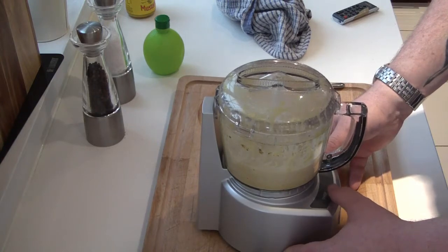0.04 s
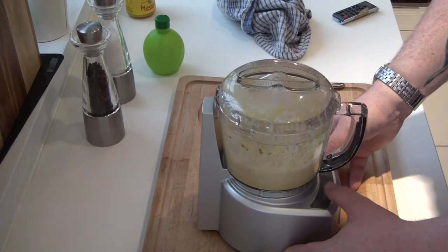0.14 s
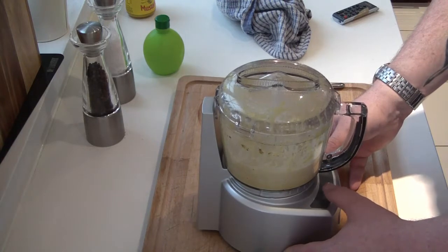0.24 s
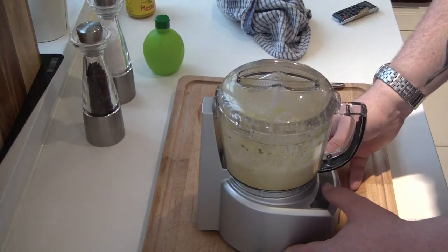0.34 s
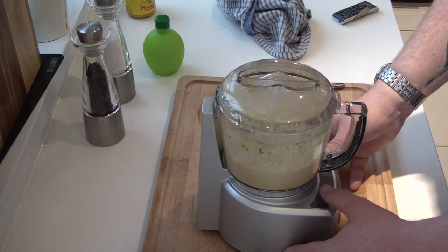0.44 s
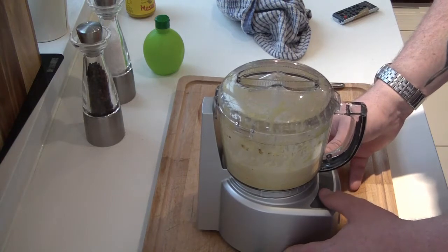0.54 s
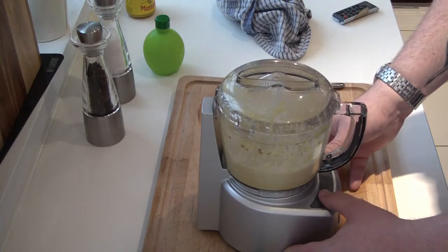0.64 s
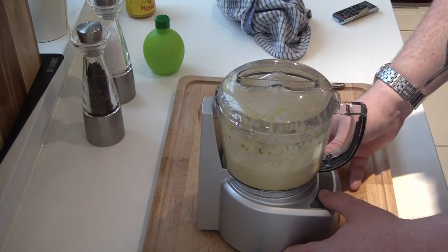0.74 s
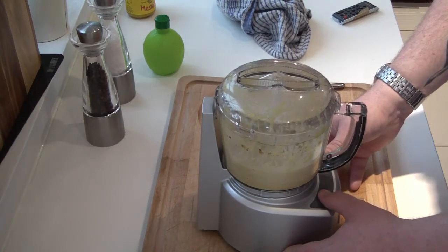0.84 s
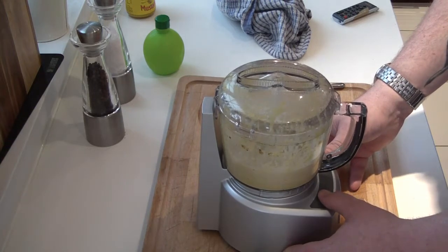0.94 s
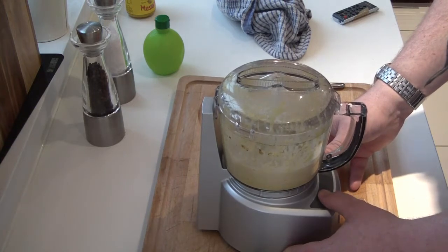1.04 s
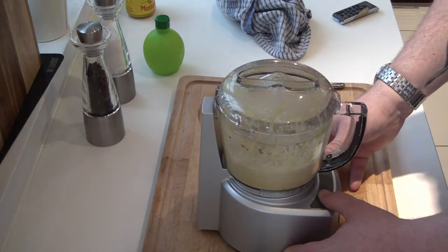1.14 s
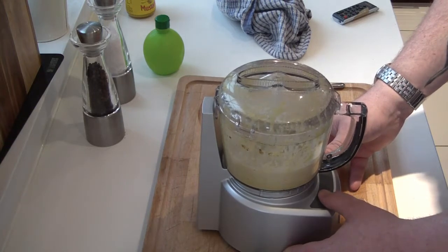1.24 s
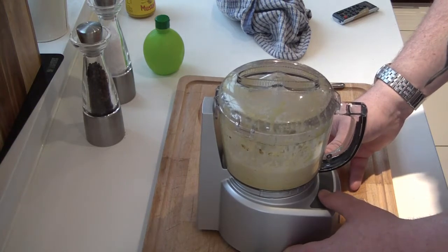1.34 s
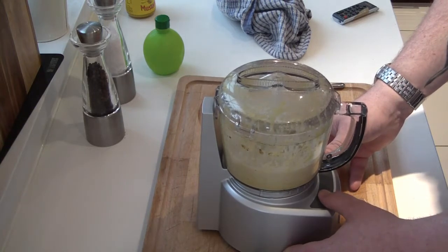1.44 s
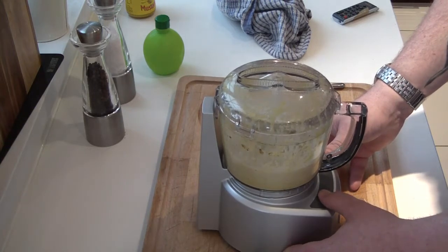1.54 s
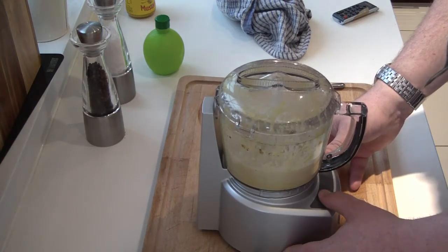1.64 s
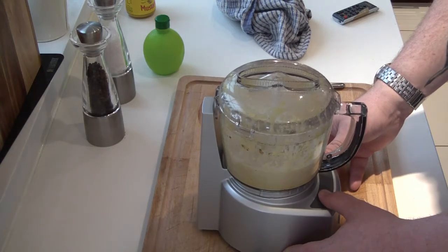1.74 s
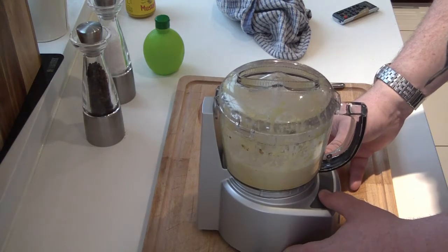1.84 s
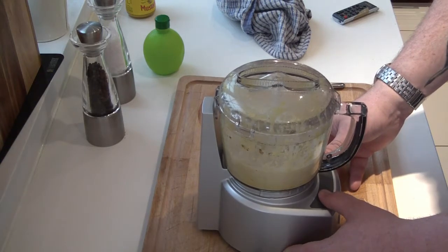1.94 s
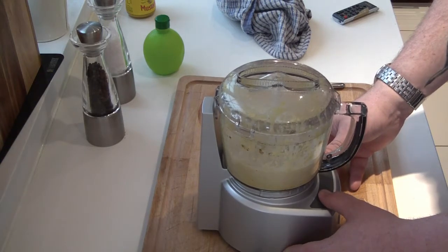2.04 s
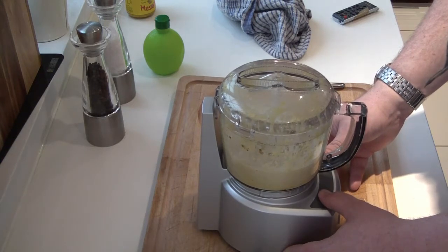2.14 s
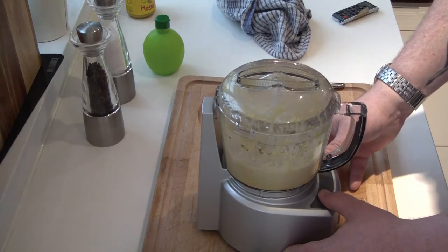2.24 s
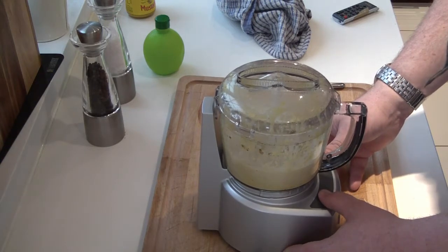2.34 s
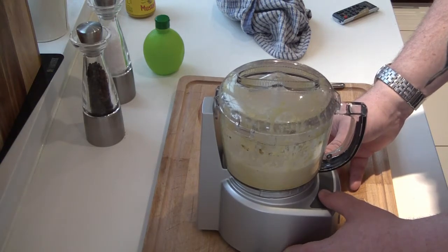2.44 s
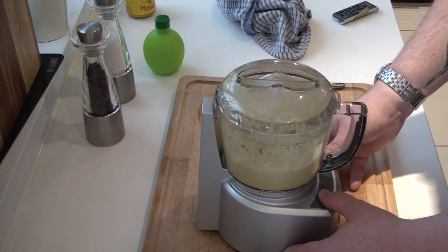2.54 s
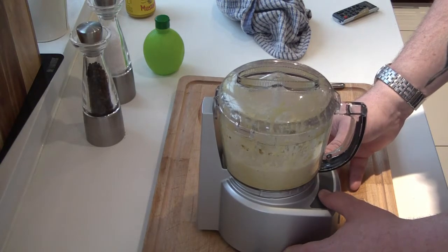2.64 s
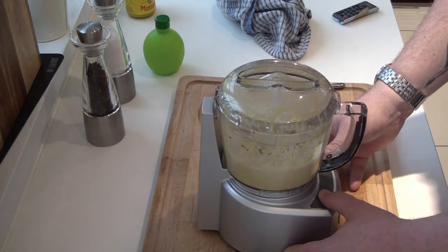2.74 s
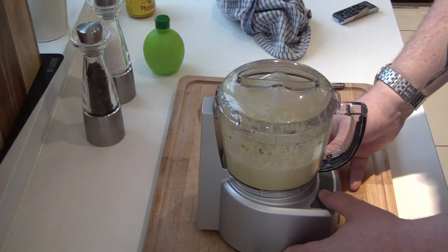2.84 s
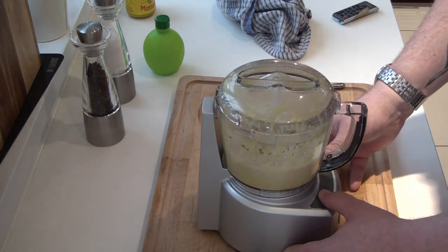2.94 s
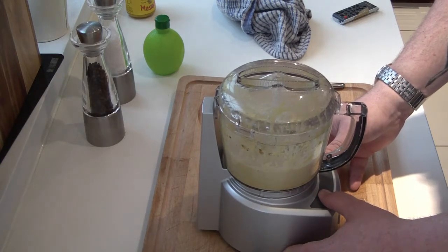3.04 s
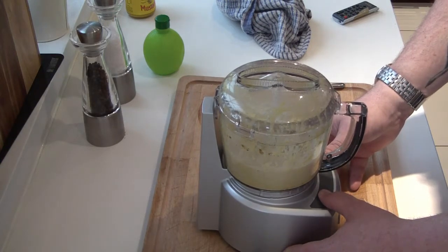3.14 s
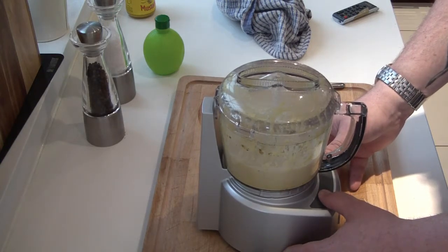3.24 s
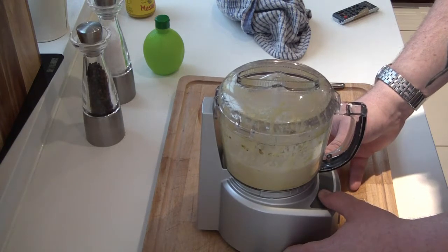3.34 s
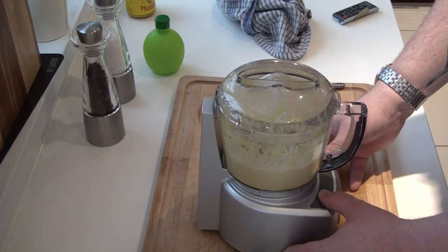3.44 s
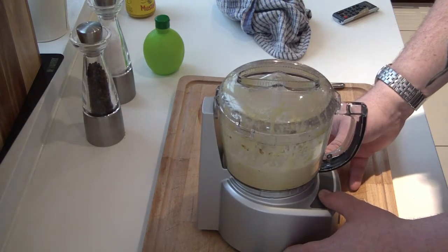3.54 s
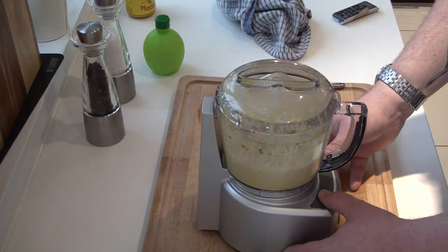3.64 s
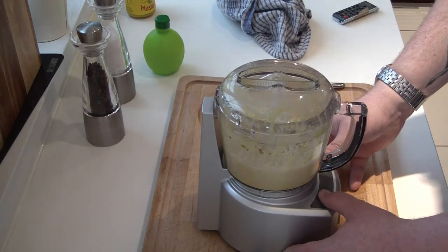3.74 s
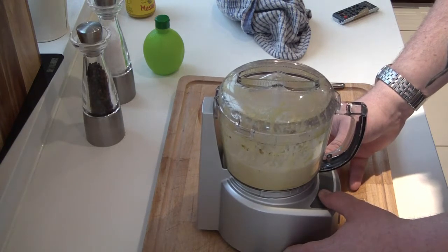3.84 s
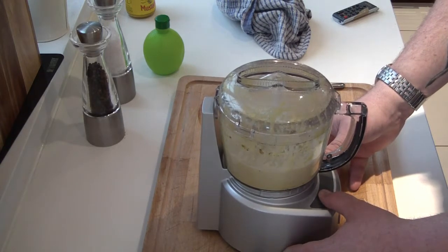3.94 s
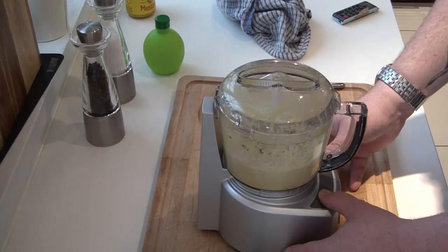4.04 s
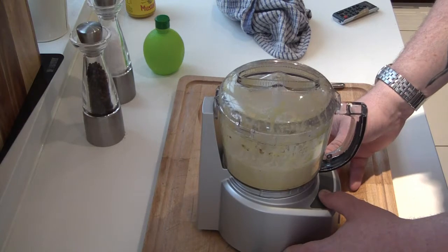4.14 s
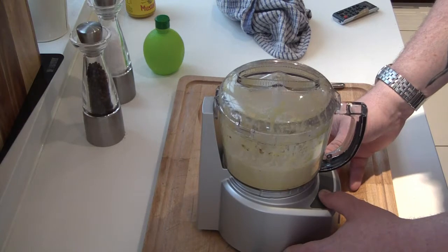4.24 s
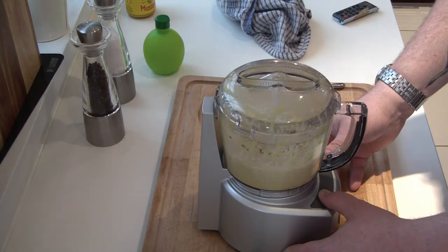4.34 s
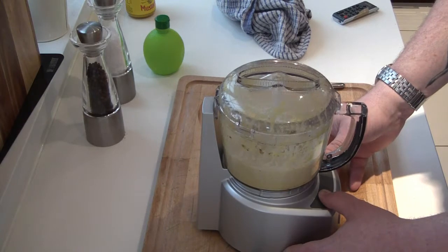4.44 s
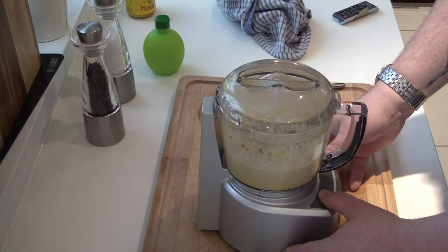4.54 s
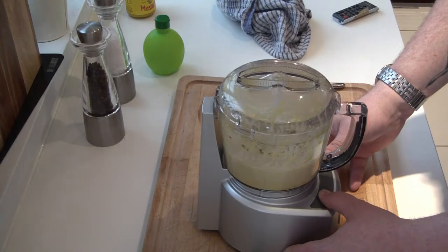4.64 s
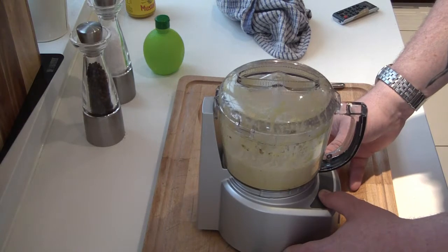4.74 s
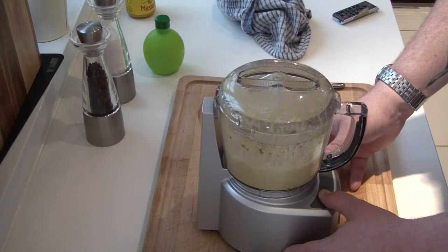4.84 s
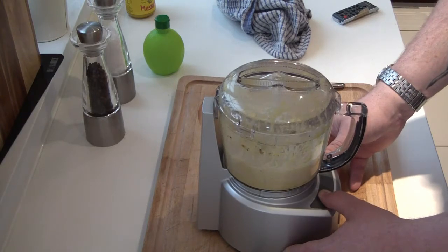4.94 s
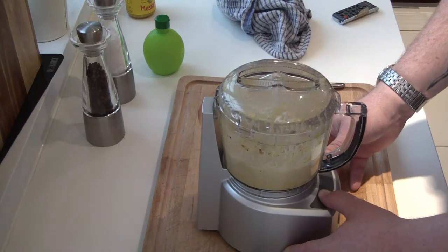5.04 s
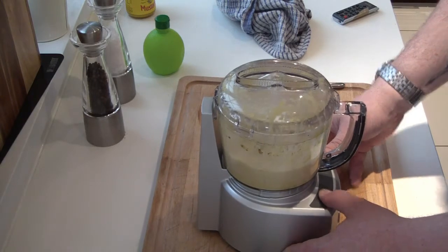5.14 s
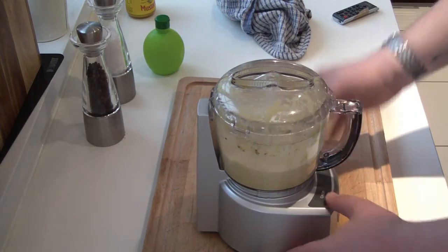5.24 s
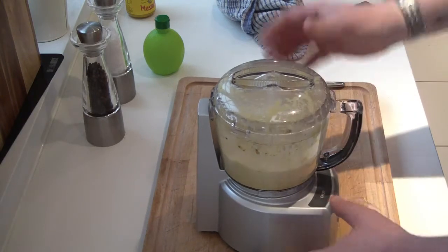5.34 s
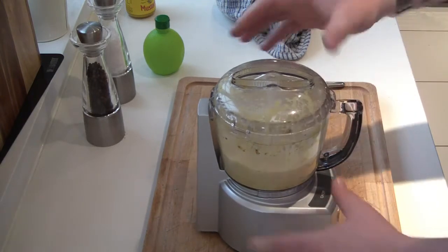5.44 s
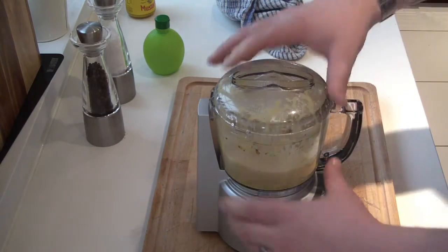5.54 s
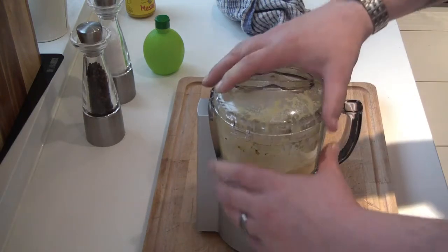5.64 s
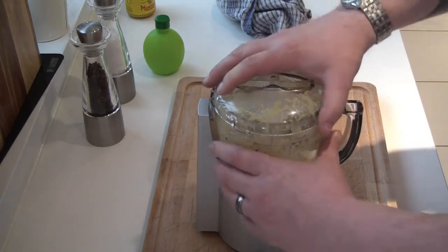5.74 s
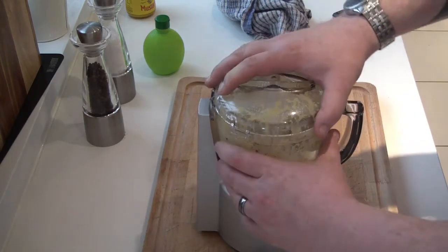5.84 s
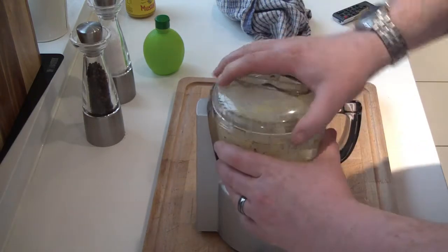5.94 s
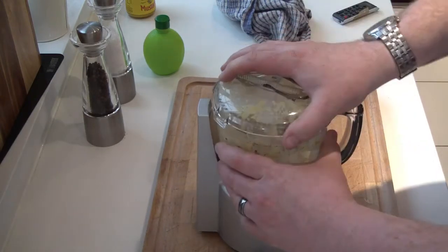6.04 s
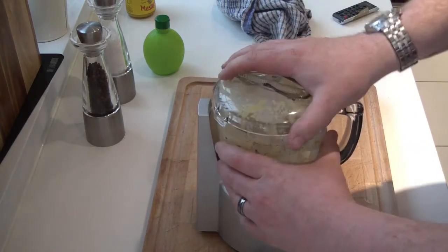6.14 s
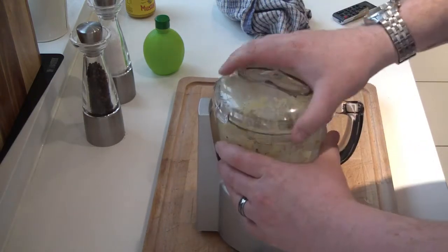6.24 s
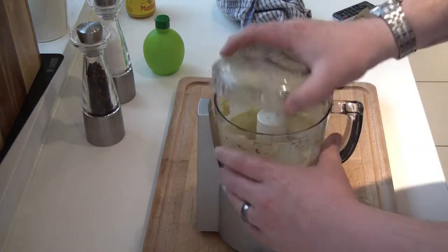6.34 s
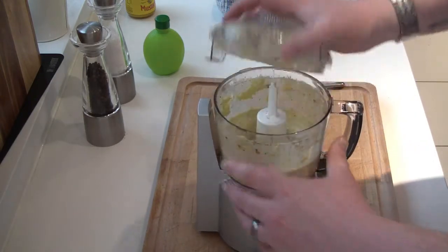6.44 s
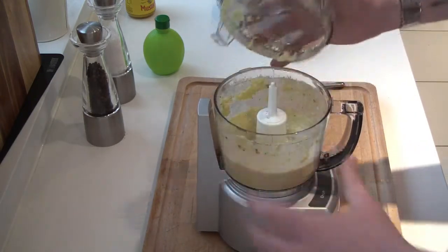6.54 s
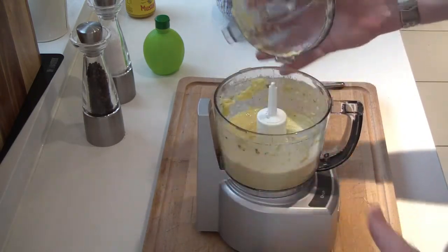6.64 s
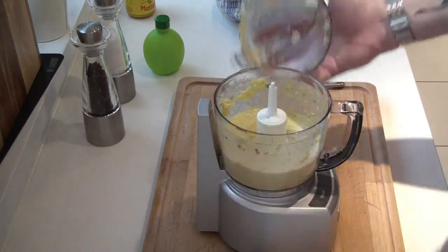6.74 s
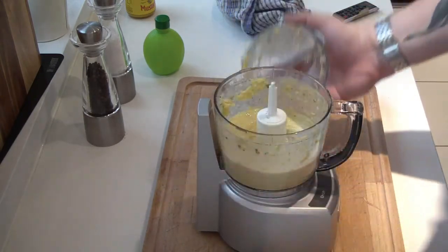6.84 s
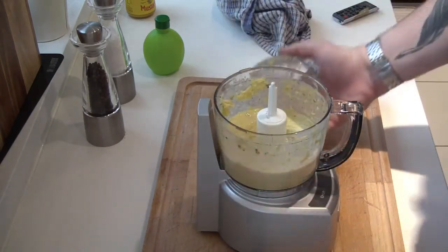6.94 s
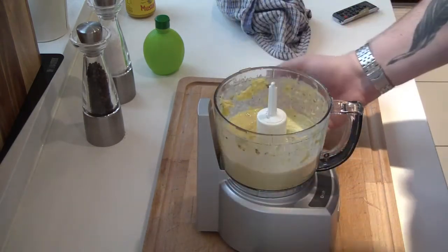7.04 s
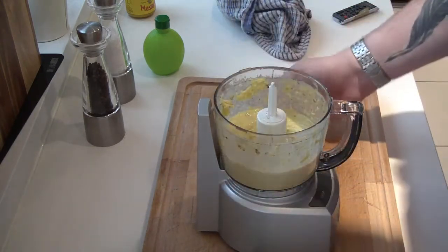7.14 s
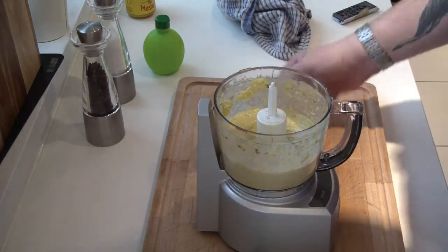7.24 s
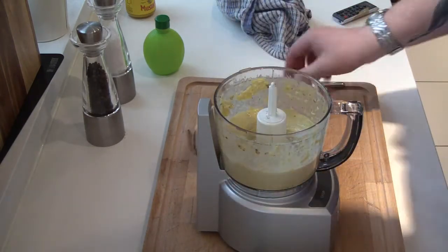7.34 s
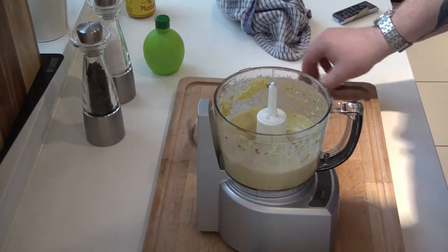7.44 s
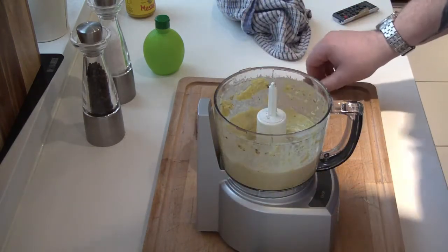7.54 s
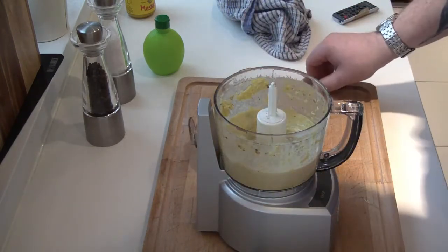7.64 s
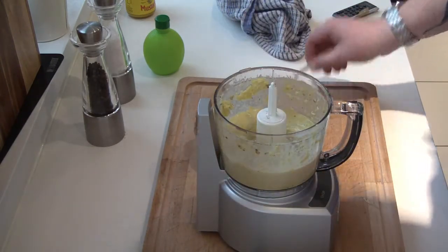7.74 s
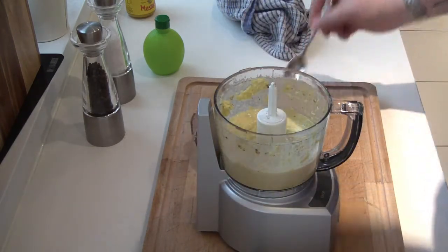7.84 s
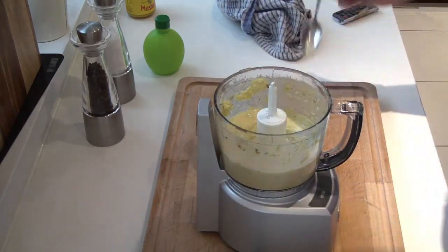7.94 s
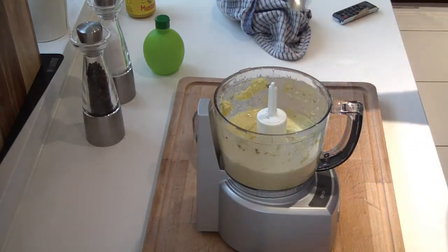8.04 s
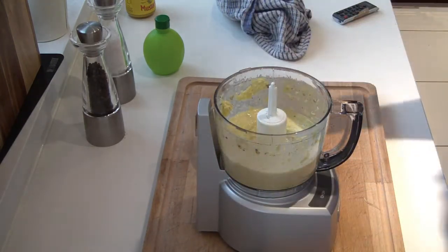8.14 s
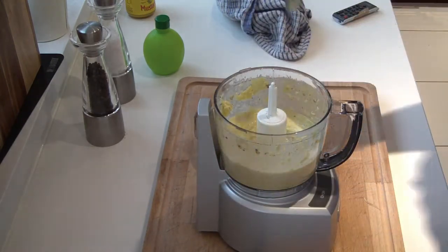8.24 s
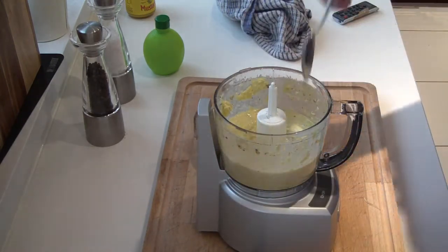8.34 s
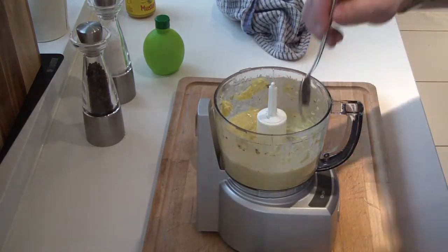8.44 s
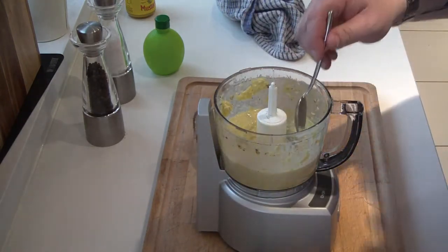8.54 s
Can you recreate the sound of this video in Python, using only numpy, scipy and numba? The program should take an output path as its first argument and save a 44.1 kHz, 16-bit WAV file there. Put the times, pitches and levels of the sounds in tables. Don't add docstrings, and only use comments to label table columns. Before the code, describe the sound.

Close stereo pickup of a small geared kitchen machine: rough bright whine, fizzing food churn and low drumming on a board. A brief drop and restart come early, then steady running and a fast falling whine to a stop. A hard latch click, soft handling, a double plastic clack and rattling rocks follow, with short kitchen reverberation. Loud moments sound flattened by automatic gain; quiet hiss remains.

```python
import sys
import numpy as np
from scipy import signal
from scipy.fft import rfft, irfft, next_fast_len
from scipy.io import wavfile
from scipy.ndimage import uniform_filter1d, map_coordinates
from numba import njit

SR = 44100
rng = np.random.default_rng(int(sys.argv[2]) if len(sys.argv) > 2 else 0)


def wav_record(signal):
    frames = np.transpose(np.atleast_2d(signal))
    bounded = np.clip(frames, -1, 1)
    quanta = np.round(bounded * 32767).astype(np.int16)
    wavfile.write(sys.argv[1], SR, quanta)


def field_ratio(decibels):
    return 10 ** (np.asarray(decibels, dtype=float) / 20)


N = 378378
TEETH = 20


def unit(x):
    return x / np.sqrt(np.mean(np.abs(x) ** 2) + 1e-20)


def along(points, hz):
    f, v = np.transpose(points)
    return np.interp(np.log(hz + 1), np.log(f + 1), v)


def drift(position):
    return map_coordinates(rng.standard_normal(int(position[-1]) + 4), [position])


def wander(rate, phase):
    return drift(rate) * np.sin(phase) + drift(rate) * np.cos(phase)


def filtered(x, response):
    m = next_fast_len(N + SR // 2)
    return irfft(rfft(x, m) * response(np.fft.rfftfreq(m, 1 / SR)), m)[..., :N]


def coloured(spectrum):
    closed = [(10, -90)] + list(spectrum) + [(20000, -90)]
    return unit(filtered(rng.standard_normal(N), lambda hz: field_ratio(along(closed, hz))))


def resonant(modes):
    def response(f):
        total = 0
        for k, (centre, width, db) in enumerate(modes):
            damping = 1j * f * abs(width)
            total = total + (-1) ** k * field_ratio(db) * 1j * f * abs(width) / (centre * centre - f * f + damping)
        return total
    return response


def soft(corner_hz):
    return lambda hz: 1 / (1 + 1j * hz / corner_hz) ** 2


# pressed and let go in seconds, full tooth-mesh rate in Hz,
# whistle under steady load in dB.
PRESSES = [
    (-1, .345, 3730, -12.5),
    (.712, 5.27, 3626, -47),
]


def rotor():
    spin_up_s, creep_s, creep_share = .11, .35, .05
    brake_hz_per_s, brake_onset_s, crawl_hz = 10100, .04, 270
    t = np.arange(N) / SR
    mesh_hz, steady_db = np.zeros(N), np.zeros(N)
    for pressed, released, full_hz, whistle_db in PRESSES:
        on, off = np.clip(t - pressed, 0, None), np.clip(t - released, 0, None)
        start_hz = mesh_hz[max(int(pressed * SR), 0)]
        lag = (1 - creep_share) * np.exp(-on / spin_up_s) + creep_share * np.exp(-on / creep_s)
        lost_hz = brake_hz_per_s * (off - brake_onset_s * (1 - np.exp(-off / brake_onset_s)))
        wanted_hz = full_hz - (full_hz - start_hz) * lag - lost_hz
        run_hz = crawl_hz * np.logaddexp(0, wanted_hz / crawl_hz)
        mesh_hz = np.where(t > pressed, run_hz + 1, mesh_hz)
        steady_db = np.where(t > pressed, whistle_db, steady_db)
    torque = np.gradient(mesh_hz) * SR / brake_hz_per_s
    torque = uniform_filter1d(torque, size=SR // 25 + 1, origin=SR // 50)
    pull, brake = np.tanh(3.7 * np.clip(torque, 0, None)), np.clip(-torque, 0, 1)
    return mesh_hz, pull, brake, steady_db


# multiple of mesh rate, relative width, level in dB.
MESH = [(.96, .06, 0), (.9, .22, -1), (1.97, .07, -2.5), (1.86, .17, -3), (2.92, .14, 1), (2.55, .35, -32)]
# shaft order, level in dB.
TONES = [(19, -11), (20, -12), (40, -18), (16.6, -19)]
# frequency in Hz, level in dB.
CASE = [(300, -29), (700, -1), (1400, -67), (2400, 5.5), (3500, 6), (5000, -1.5), (8000, 4.5), (12000, -2),
        (15000, -10)]


def gear_whine(teeth, pace, pull):
    t = np.arange(N) / SR
    shaft = 2 * np.pi * teeth / TEETH
    whine = np.zeros(N)
    for multiple, width, db in MESH:
        band = wander(abs(width) * 2 * teeth, 2 * np.pi * multiple * teeth)
        whine += field_ratio(db) * pace ** (0.85 * multiple) * band
    for order, db in TONES:
        whine += field_ratio(db + 4.9 * drift(14 * t)) * np.sin(order * shaft + 2.54 * drift(22 * t))
    whine *= 1 + .2 * np.cos(shaft) + .15 * np.cos(shaft / 3)
    whine = unit(filtered(whine, lambda hz: field_ratio(along(CASE, hz))))
    slow_db, pull_db = 11, 7
    return whine * field_ratio(-20.5 + slow_db * (1 - pace) + pull_db * pull + 1.4 * drift(12 * t))


# frequency in Hz, width in Hz, level in dB.
GEARBOX = [(2700, 2760, -3)]


def gear_whistle(teeth, pace, pull, brake, steady_db):
    t = np.arange(N) / SR
    pull_db, coast_db = -8, -15.5
    torque_grip = field_ratio(pull_db) * pull + field_ratio(coast_db) * brake
    grip = field_ratio(steady_db) * (1 - brake) + torque_grip * pace ** 0.72
    flank = 2 * np.pi * .965 * teeth + 0.7 * drift(.05 * teeth)
    tone = 0.58 * np.sin(flank) + wander(130 * t, flank)
    overtone = 0.5 * wander(250 * t, 2 * flank)
    cavity = resonant(GEARBOX)
    return filtered(grip * (tone + overtone), lambda hz: cavity(hz) * soft(corner_hz=7000)(hz))


# frequency in Hz, level in dB per Hz.
CHURN = [(90, -32), (200, -22.5), (440, -29), (700, -28.5), (1200, -22), (1400, -17), (1700, -15.5),
         (2100, -19), (4000, -12), (5000, -19), (9000, -13.5), (12000, -19), (14700, -27)]


def churning(teeth, pace, pull):
    t = np.arange(N) / SR
    blade_turn = np.cos(2 * np.pi * teeth / TEETH / 4)
    churn = coloured(CHURN) * field_ratio(1.5 * drift(60 * t) + .8 * drift(7 * t) + .8 * blade_turn)
    dull = unit(filtered(churn, soft(corner_hz=5800)))
    churn = pace ** 1.3 * churn + .9 * (1 - pace) * dull
    slow_db, pull_db = 3.5, 6
    return churn * field_ratio(-19.5 + slow_db * (1 - pace) + pull_db * pull)


# frequency in Hz, width in Hz, level in dB.
BASE = [(165.5, 30, -20.5), (221.5, 9.8, -14), (272.3, 18, -3), (310.7, 11.9, 0), (351.4, 19.7, -10),
        (579, 39, -24.5)]


def base_drone(teeth, pull, brake):
    t = np.arange(N) / SR
    blade = np.diff(np.floor(teeth / TEETH / 4), prepend=0)
    drone = unit(filtered(0.34 * unit(blade) + rng.standard_normal(N), resonant(BASE)))
    coast_db, pull_db, sway_db = -5.5, 4.5, 2
    return drone * field_ratio(-28 + coast_db * brake + pull_db * pull + sway_db * drift(12 * t))


# frequency in Hz, level in dB per Hz.
SHAKE = [(30, -16), (48, 2), (63, 10), (73, -56), (120, -25)]


def motor():
    mesh_hz, pull, brake, steady_db = rotor()
    teeth = np.cumsum(mesh_hz) / SR
    pace = mesh_hz / mesh_hz.max()
    stop_s, stop_fade_s = 5.84, 0.09
    coast = np.clip((stop_s - np.arange(N) / SR) / stop_fade_s, 0, 1)
    dying_pace = 0.064
    alive = pace * (1 + dying_pace) / (pace + dying_pace)
    works = gear_whine(teeth, pace, pull) + churning(teeth, pace, pull) + base_drone(teeth, pull, brake)
    shake = field_ratio(-40.5) * coloured(SHAKE)
    whistle = gear_whistle(teeth, pace, pull, brake, steady_db)
    return coast * (alive * works + pace * shake + whistle)


def knocks(table, body, shell, contact_hz, drive_db, drag=1):
    t = np.arange(SR // 12) / SR / drag
    push = np.zeros((3, N + len(t)))
    decay_s = np.array([[.014], [.011], [.009]])
    for s, *band_db in table:
        rough = rng.standard_normal((3, len(t))) * field_ratio(-60 * t / decay_s) * (1 - np.exp(-t / 0.00044))
        rough /= np.linalg.norm(rough, axis=1, keepdims=True)
        rough *= np.clip([[.39], [.28], [.2]] * np.array(drag), 0, 1)
        rough[:, 9] += 1 / drag ** 2
        push[:, round(s * SR):][:, :len(t)] += field_ratio(np.array(band_db) + drive_db)[:, None] * rough
    thud = filtered(push[0, :N], lambda hz: resonant(body)(hz) * soft(corner_hz=2500)(hz))
    clack = filtered(push[1, :N], lambda hz: resonant(shell)(hz) * soft(contact_hz)(hz))
    crack = filtered(push[2, :N], resonant([(8200, 36000, 0)]))
    return field_ratio(41.0) * thud + field_ratio(36.0) * clack + field_ratio(29) * crack


# start in seconds, body, shell and crack levels in dB.
LATCH = [
    (5.9705, -14, -6, -7.5),
    (5.9755, -15, -26, -22),
    (5.988, -13, -25, -34),
    (6.369, -39.5, -39, -36.5),
]
# start in seconds, body, shell and crack levels in dB.
NUDGE = [
    (5.922, -14, -70, -73),
    (5.972, -12.5, -70, -80),
    (7.999, -27, -63, -57),
]
# frequency in Hz, width in Hz, level in dB.
BOWL = [(143.8, 54, -1), (297, 37, 1), (582, 150, 6.5), (1010, 200, 3.5)]
BOWL_WALL = [(2430, 94, 4.5), (1170, 1100, -12), (3270, 9300, -2)]


def unlatching():
    snap = knocks(LATCH, BOWL, BOWL_WALL, contact_hz=8880, drive_db=1.0, drag=1.14)
    return snap + knocks(NUDGE, BASE, BOWL_WALL, contact_hz=3000, drive_db=8)


# start in seconds, body, shell and crack levels in dB.
COUNTER = [
    (7.101, 1.5, -1, -33),
    (7.148, 0.5, -9.5, -39),
    (7.171, -10.5, -8.5, -47),
    (7.194, -13, -23, -42),
    (7.232, -12, -17, -35.5),
    (7.251, -17, -25, -41),
    (7.423, -47, -31, -40),
]
# start in seconds, body, shell and crack levels in dB.
ROCKING = [(7.478, -14, -14.5, -47), (7.502, -20, -24, -52), (7.519, -23, -22, -52),
           (7.625, -15.5, -23, -52), (7.633, -15, -6, -53), (7.644, -17, -13.5, -55),
           (7.665, -15, -24, -54), (7.688, -18, -34, -54), (7.724, -17, -16, -48), (7.749, -28, -32, -47),
           (7.854, -21.5, -44, -53), (7.871, -26, -39, -48), (7.979, -33, -31, -50)]
# frequency in Hz, width in Hz, level in dB.
LID = [(165, 42, -2.5), (308, 48, -5.5), (466, 34, 6), (521, 60, 1.5), (660, 90, -1.5), (924, 160, -5),
       (1350, 140, -12)]
LID_WALL = [(1620, 110, 2.5), (2465, 88, 5), (2170, 500, -8), (2910, 150, -2.5), (3500, 70, -3),
            (4100, 290, -10)]
LID_RIM = [(1634, 65, 3), (2050, 130, 6.5), (2400, 210, 1.5), (2550, 140, 1.5), (2950, 180, -13),
           (3980, 480, -24)]


def lid_on_counter():
    landing = knocks(COUNTER, LID, LID_WALL, contact_hz=5060, drive_db=-3)
    return landing + knocks(ROCKING, LID, LID_RIM, contact_hz=3970, drive_db=.7, drag=1.27)


# start in seconds, body, shell and crack levels in dB.
SCUFFS = [(5.906, -30, -24, -41), (6.668, -30, -34, -48), (6.699, -38, -32.5, -40), (6.766, -32, -34, -43),
          (7.056, -40, -30, -37), (8.223, -44, -52, -51), (8.392, -48, -52, -56), (8.434, -40.5, -47, -51)]


def scuffs():
    return knocks(SCUFFS, BOWL, BOWL_WALL, contact_hz=3000, drive_db=-6.0, drag=10.0)


# start in seconds, length in seconds, pitch in Hz, level in dB.
SQUEAKS = [(6.3, 0.011, 1610, -27), (6.445, 0.13, 643, -46), (6.627, 0.27, 1470, -50),
           (6.72, 0.14, 1135, -52), (7.97, .25, 3200, -56.5), (8.318, 0.15, 1760, -55),
           (8.502, 0.11, 715, -51)]


def squeaks():
    t = np.arange(N) / SR
    out = np.zeros(N)
    for s, length, hz, db in SQUEAKS:
        swell = np.sin(np.pi * np.clip((t - s) / length, 0, 1))
        out += field_ratio(db + 4.7 * drift(30 * t)) * swell * np.sin(2 * np.pi * hz * t + 1.8 * drift(40 * t))
    return out


# peak in seconds, counter rumble in dB, rubbing in dB.
GRIPS = [(6.04, -22, -24), (6.36, -33, -37), (6.67, -36, -38), (6.79, -40, -36), (7.13, -25, -46),
         (7.51, -32, -18.5), (7.64, -33, -19.5), (7.76, -44, -23.5), (7.88, -38, -31), (8.11, -43, -40),
         (8.23, -45, -33.5), (8.4, -44, -31.5), (8.53, -43, -45)]
# frequency in Hz, level in dB per Hz.
RUMBLE = [(20, -47), (45, -10), (70, -16), (130, -24)]
RUB = [(90, -13), (160, 6.5), (300, -0.5), (600, -13.5), (1200, -40), (3000, -20)]


def hands():
    t = np.arange(N) / SR
    rise_db_per_s, fall_db_per_s = 320, 137
    begun = np.clip((t - 4.98) / 0.12, 0, 1)
    rumble, rub = field_ratio(-51.5) * begun, field_ratio(-51.5) * begun
    for s, rumble_db, rub_db in GRIPS:
        swell = field_ratio(np.minimum(rise_db_per_s * (t - s), fall_db_per_s * (s - t)))
        rumble = rumble + field_ratio(rumble_db) * swell
        rub = rub + field_ratio(rub_db) * swell
    return rumble * coloured(RUMBLE) + rub * field_ratio(2 * drift(25 * t) - 4) * coloured(RUB)


def ports(x, lean):
    return filtered(np.array([x, x]), lambda hz: field_ratio(along(lean, hz) * [[.5], [-.5]]))


# frequency in Hz, time to -60 dB in seconds.
KITCHEN = [(100, 0.99), (500, 0.63), (2500, 0.7), (10000, 0.51)]


def kitchen(x):
    hz, t, z = signal.stft(rng.standard_normal((2, 5, SR * 3 // 4)), SR, nperseg=256)
    tails = signal.istft(z * field_ratio(-60 * t / along(KITCHEN, hz)[:, None]), SR, nperseg=256)[1]
    tails = tails / np.linalg.norm(tails[0, 0])
    step = (np.arange(N) / SR / .3 - np.arange(5)[:, None]) % 5 - 1
    shares = x * np.cos(np.pi / 2 * np.clip(step, -1, 1))
    shares = np.pad(shares, ((0, 0), (260, 0)))
    m = next_fast_len(N + SR)
    return irfft((rfft(shares, m) * rfft(tails, m)).sum(axis=1), m)[:, :N]


# frequency in Hz, level in dB per Hz.
QUIET = [(180, -30), (300, 3), (2040, -5), (2400, -3.5), (2790, -4.5), (3510, -5.5), (4490, -9),
         (15500, -16.5)]


def quiet_air():
    air = field_ratio(-47.5) * np.array([coloured(QUIET) for _ in range(3)])
    return 0.95 * air[0] + 0.58 * air[1:]


# frequency in Hz, left over right in dB.
LEAN = [(60, -2), (300, -0.3), (1200, 0.5), (2400, 0.5), (4400, 0.5), (8100, 3.5), (15000, 0.5)]
# frequency in Hz, level in dB.
SIDE_SHARE = [(60, -15), (250, -22), (1000, -25), (2000, -24), (3500, -12), (7000, -9.5), (13000, -5.5)]


def scene():
    machine = motor()
    latch = unlatching()
    lid = lid_on_counter() + scuffs() + squeaks()
    wet, unlike = kitchen(field_ratio(-5.5) * machine + field_ratio(1.5) * latch + field_ratio(-2.0) * lid)
    side = filtered(unlike, lambda hz: field_ratio(along(SIDE_SHARE, hz) + 3.5))
    handled = ports(latch + lid + hands(), [(60, -3.2), (300, -0.81), (8000, 1.0)])
    near = ports(machine, LEAN) + handled
    return near + wet + side * [[1], [-1]] + quiet_air()


@njit
def follower(level, rise, fall):
    out, held = np.empty_like(level), 0.
    for i in range(len(level)):
        held += (level[i] - held) * (rise if level[i] > held else fall)
        out[i] = held
    return out


def roll_off(x):
    return signal.sosfilt(signal.butter(12, 16100, fs=SR, output="sos"), x)


def record(dry):
    held = follower(np.abs(dry).max(axis=0), 1 / (0.015 * SR), 1 / (0.034 * SR))
    x = dry / (1 + (held / field_ratio(-12.5)) ** 4) ** 0.24
    x = x / (1 + np.abs(x) ** 10) ** .1
    top_hz, edge_hz = 15500, 500
    mix = filtered(0.99 * x, lambda hz: np.clip((top_hz - hz) / edge_hz, 0, 1))
    return roll_off(mix)


dry = scene()
out = record(dry)
wav_record(out)
```